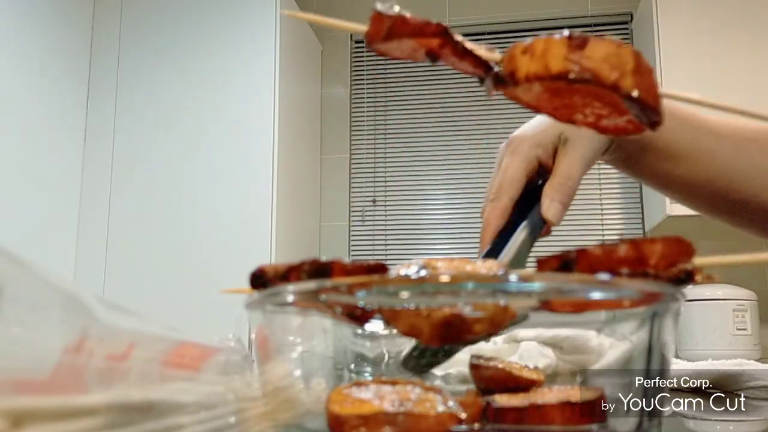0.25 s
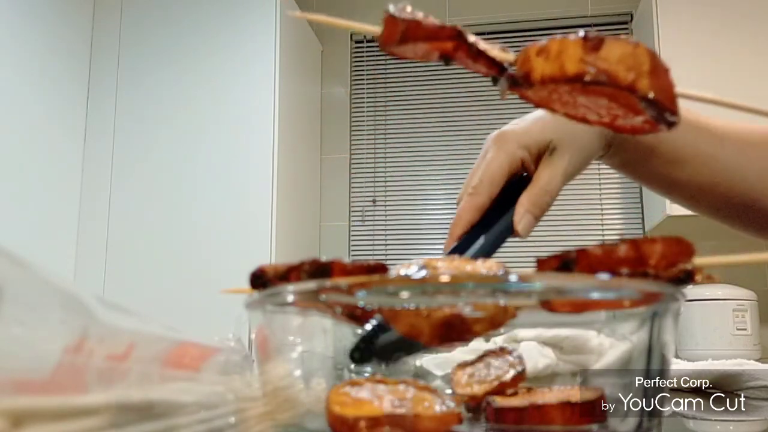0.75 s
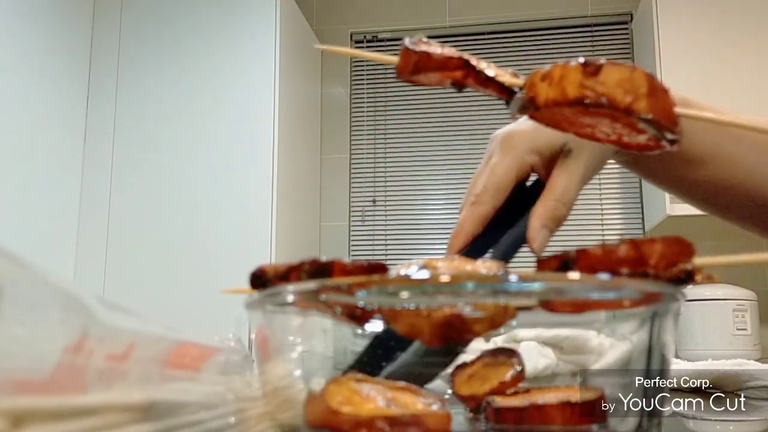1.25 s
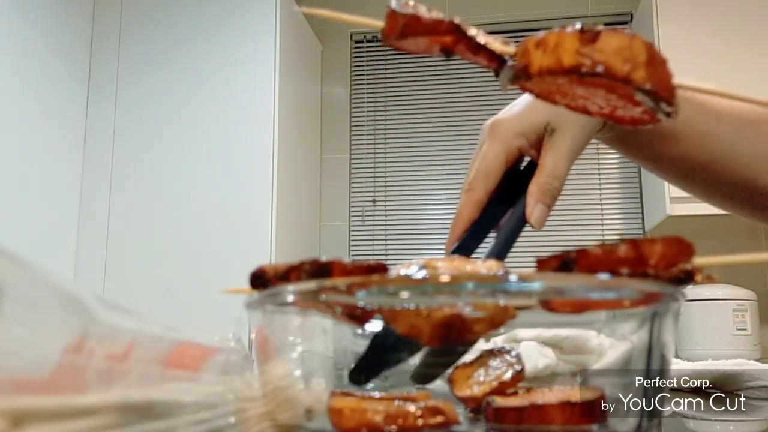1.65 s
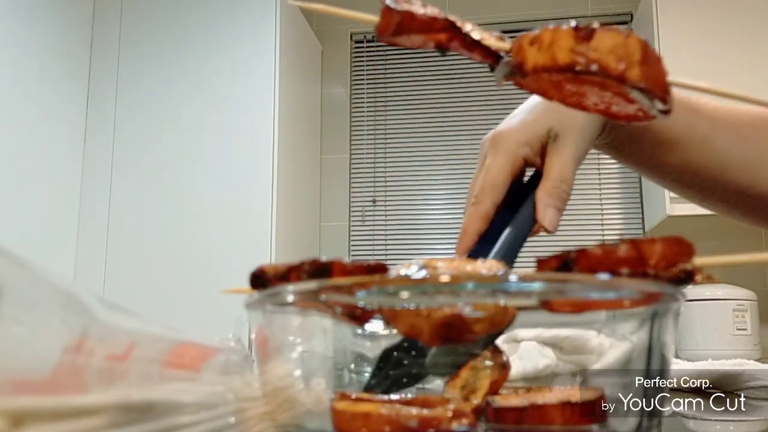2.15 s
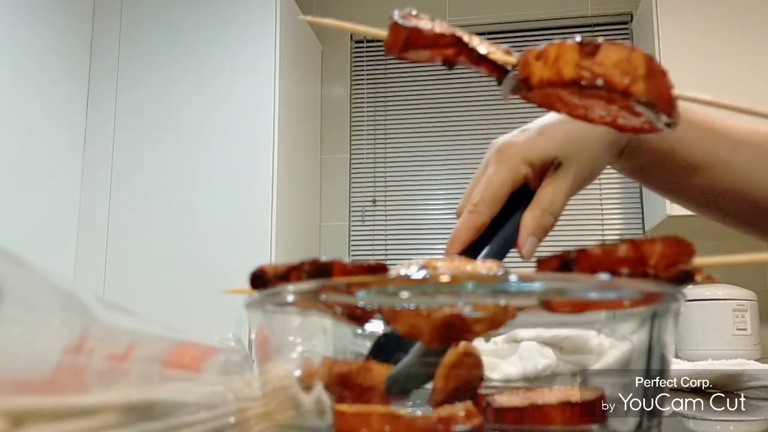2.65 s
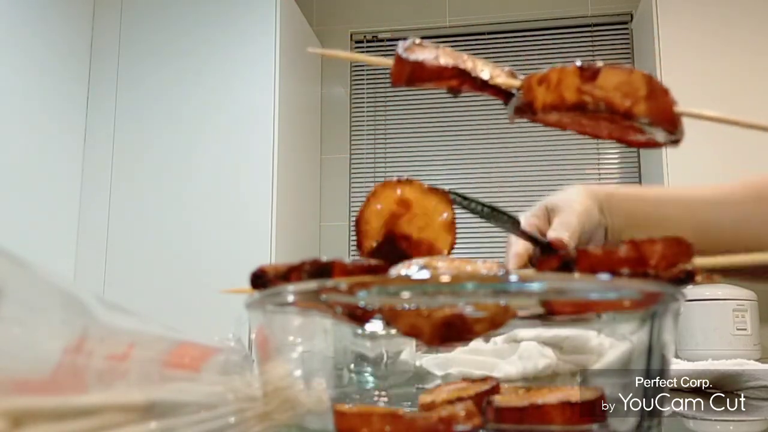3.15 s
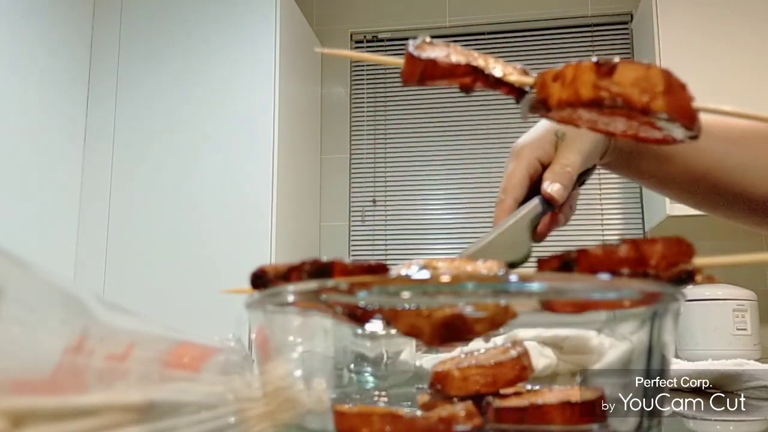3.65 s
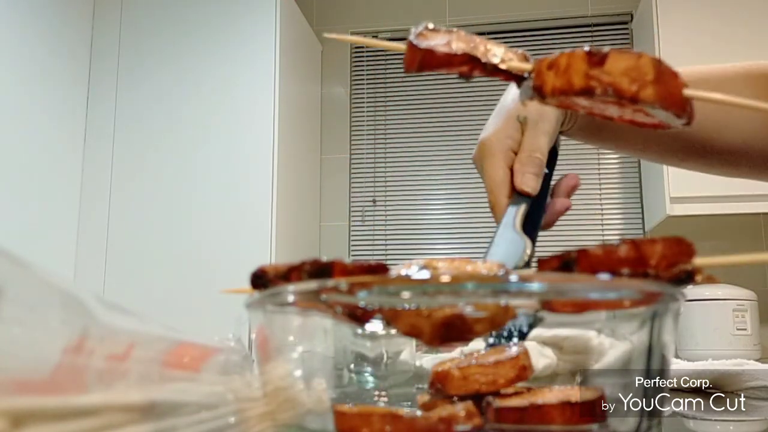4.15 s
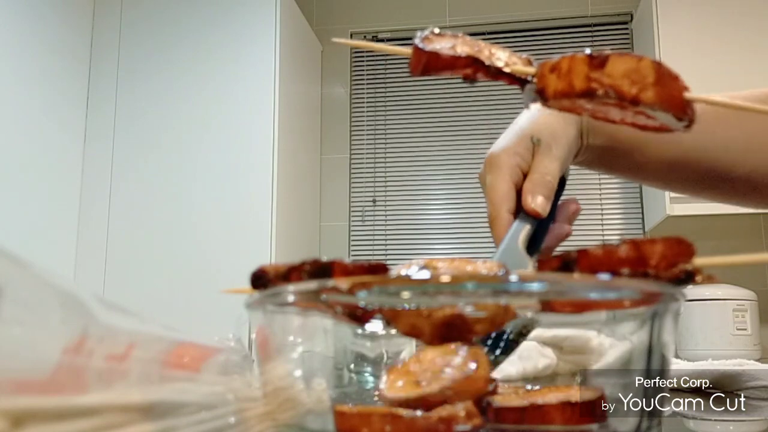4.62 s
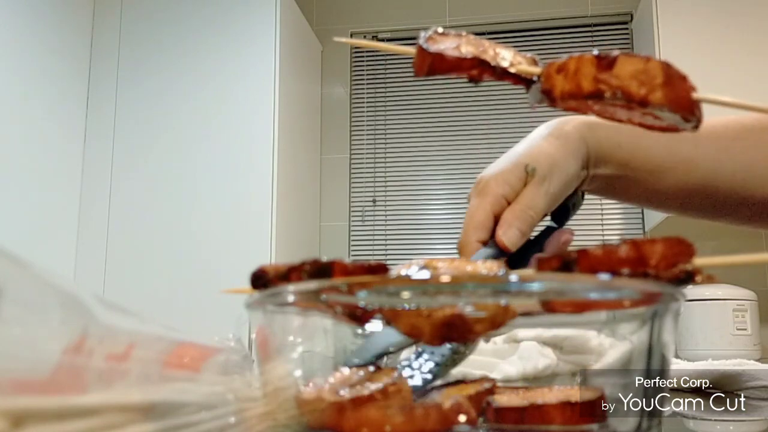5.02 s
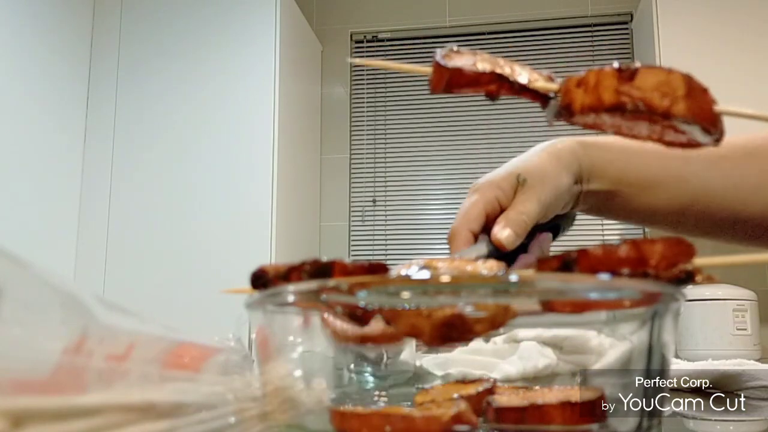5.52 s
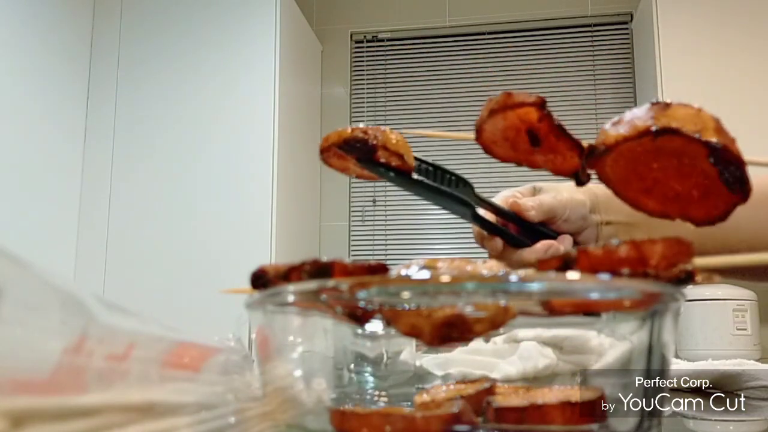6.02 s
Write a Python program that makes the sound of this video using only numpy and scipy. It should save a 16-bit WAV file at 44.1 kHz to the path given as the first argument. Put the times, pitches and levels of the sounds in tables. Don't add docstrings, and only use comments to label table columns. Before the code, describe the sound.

Sparse dull glassy taps from tongs in a bowl, one heavier thud on a dish, faint food rustle and steady fan hum in a kitchen.

```python
import sys
import numpy as np
from scipy import signal
from scipy.fft import rfft, irfft, next_fast_len
from scipy.io import wavfile

SR = 44100
rng = np.random.default_rng(int(sys.argv[2]) if len(sys.argv) > 2 else 0)


def boost(x):
    u = np.asarray(x, float) / 20
    return 10 ** u


def materialize(psi):
    bounded = np.clip(np.atleast_2d(psi).T, -1, 1)
    quanta = np.round(bounded * 32767).astype(np.int16)
    wavfile.write(sys.argv[1], SR, quanta)


N = 276987

# t/s, knock level/dB, knock f/Hz, rim ring level/dB, contact hardness level/dB
BOWL_TAPS = [(0.4062, -54, 1170, -42.5, -52), (0.4474, -46, 1140, -46.5, -57),
             (0.7641, -20, 1164, -28, -41.5), (1.2958, -51, 1210, -58, -46),
             (1.3856, -18, 1194, -23, -26.5), (1.6229, -30.5, 1070, -39.5, -52),
             (1.864, -39, 1250, -52, -47), (2.7535, -22.5, 1260, -29.5, -31),
             (2.838, -25.5, 1283, -33.5, -37.5), (3.2385, -14, 1308, -24, -29.5),
             (3.4284, -22, 1343, -41, -50), (3.877, -28.5, 1268, -30.5, -35.5),
             (4.0458, -21.5, 1324, -31, -42), (4.2245, -26, 1312, -30.5, -39.5)]


def rms_one(x):
    return x / np.sqrt(np.mean(x ** 2) + 1e-20)


def coloured(points, size):
    hz, level_db = np.transpose(points)
    grid_hz = np.arange(size // 2 + 1) * SR / size + 1
    weight = boost(np.interp(np.log(grid_hz), np.log(hz), level_db))
    return rms_one(irfft(rfft(rng.standard_normal(size)) * weight, size))


def ring(x, hz, t60):
    r, w = boost(-60 / (t60 * SR)), 2 * np.pi * hz / SR
    return signal.lfilter([0, np.sin(w)], [1, -2 * r * np.cos(w), r * r], x + 1e-18)


def clicks(times, levels_db):
    x = np.zeros(N)
    x[(np.asarray(times) * SR).astype(int)] = boost(levels_db)
    return x


def struck(times, levels_db, modes, scatter_db, press_s):
    scatter = rng.normal(0, 1, (len(times), len(modes))) * scatter_db
    out = np.zeros(N)
    r = np.exp(-1 / (max(press_s, 1e-4) * SR))
    for k, (hz, mode_db, t60) in enumerate(modes):
        w = 2 * np.pi * hz / SR
        rung = ring(clicks(times, np.asarray(levels_db) + mode_db + scatter[:, k]), hz, t60)
        swelling = signal.lfilter([2 * np.sin(w) * (1 - r)], [1, -2 * r * np.cos(w), r * r], rung)
        out += swelling * (-1) ** k
    return out


def crack(times, levels_db, t60, low_hz, high_hz, rise_s=0.0001):
    r, rise = boost(-60 / (t60 * SR)), np.exp(-1 / (rise_s * SR))
    decay = np.convolve([1, -r], [1, -rise])
    shape = signal.lfilter([1 - rise], decay, clicks(times, levels_db) + 1e-18)
    band = signal.butter(2, [low_hz, high_hz], "band", fs=SR, output="sos")
    return signal.sosfilt(band, shape * rng.standard_normal(N))


def wandering_tone(hz, level_db, drift_rad):
    phase = np.cumsum(rng.standard_normal(N)) * drift_rad
    return np.sqrt(2) * boost(level_db) * np.sin(2 * np.pi * hz * np.arange(N) / SR + phase)


def appliance():
    # f/Hz, level/dB per Hz
    fan = [(36, -35), (62, -22), (71, -19), (101, -18), (118, -12), (139, -8), (177, -3.5), (205, -3.5),
           (335, -8.5), (670, -11), (848, -12.5), (1000, -12.5), (2150, -19.5), (3500, -31.5), (4550, -50),
           (7700, -120)]
    # f/Hz, level/dB per Hz
    preamp = [(2060, -73), (3500, -22), (4200, -6.5), (4640, -9), (6660, -14), (8350, -9), (9340, -16.5),
              (12000, -14.5), (14800, -9.5), (15600, -9.5)]
    # f/Hz, width/Hz, rms level/dB
    drones = [(27.5, 17, -65.5), (166, 29, -68), (304.4, 12, -62), (835.4, 52, -56.5), (1250, 160, -62),
              (4050, 10, -84.5)]
    duct_hz = [136.5, 206]
    # t/s, low over high tone level/dB
    duct_sway = [(0.21, -5), (0.45, 10), (1.2, -14), (1.45, 1.5), (2.9, -12), (3.11, 0.5), (3.45, -3.5),
                 (3.99, 22), (4.18, -10), (4.49, 27), (5.6, -6), (5.8, 19)]
    size = next_fast_len(N)
    out = boost(-51) * coloured(fan, size)[:N] + boost(-73) * coloured(preamp, size)[:N]
    for hz, width_hz, level_db in drones:
        settled = ring(rng.standard_normal(N + SR), hz, 1.8 / width_hz)[SR:]
        out += boost(level_db) * rms_one(settled)
    ratio = boost(np.interp(np.arange(N) / SR, *np.transpose(duct_sway)))
    low_share, high_share = ratio / np.hypot(1, ratio), 1 / np.hypot(1, ratio)
    for hz, share in zip(duct_hz, [low_share, high_share]):
        out += share * wandering_tone(hz, level_db=-58.5, drift_rad=0.0096)
    return out + wandering_tone(48.1, level_db=-62.5, drift_rad=0.01)


def knocks(peak_s=.003, gain_db=2.5):
    out, t = np.zeros(N), np.arange(2000) / SR
    swell = (t / peak_s * np.exp(1 - t / peak_s)) ** 2.84
    for s, level_db, hz, *_ in BOWL_TAPS:
        i = int(s * SR)
        out[i:i + len(t)] += boost(level_db + gain_db) * swell * np.sin(2 * np.pi * hz * t)
    return out


def taps(floor_hz=740, knock_room_db=-4.0, rim_room_db=-4.0, arm_room_db=-8):
    # f/Hz, level/dB, t60/s
    low_modes = [(2012, 5, .035), (2228, -1, .03), (1740, -4, .02), (2026, -17, .3)]
    mid_modes = [(3238, -10, .3), (3268, -11, .36), (3295, -16, .2), (3040, -3, .015), (3650, -4, .015)]
    high_modes = [(4628, 5, .035), (3490, 0, .02), (4612, -22, .28), (4770, -13, .02), (8382, -10, .04),
                  (5716, -11, .06)]
    # f/Hz, level/dB, t60/s
    hum_modes = [(873, 10, 0.05), (1013, 13, 0.029), (899, -13, 0.51), (823, -2, 0.027)]
    # f/Hz, level/dB, t60/s
    long_arm_modes = [(2586, 2, .035)]
    short_arm_modes = [(4004, 2, .035)]
    tip_modes = [(5500, -19, 0.042), (5674, -15, 0.067), (7100, -30, 0.014), (7410, -23, 0.037),
                 (7580, -13.5, 0.055), (8400, -6, 0.03), (10500, -36, .02)]
    # t/s, long arm level/dB, short arm level/dB, tip crack level/dB
    arm_taps = [(0.4062, -53, -45.5, -71), (0.4481, -55, -49.5, -65), (0.7638, -55, -56, -73),
                (1.2964, -48, -54, -58), (1.3865, -33, -36, -43), (1.863, -47, -45.5, -63),
                (2.7537, -35.5, -36, -54), (2.8382, -36, -33.5, -57), (3.2389, -18, -21, -41),
                (3.429, -23, -46, -64), (3.8763, -30, -35, -58), (4.0451, -28.5, -68, -54),
                (4.2251, -42, -44, -57)]
    off_glass = [.41, .45, 3.24, 3.43]
    s, knock, knock_hz, rim_low, hard = np.transpose(BOWL_TAPS)
    arm_s, arm_long, arm_short, tip = np.transpose(arm_taps)

    above_hz = knock_hz - 1260
    hum = knock - 17 - 0.1772 * np.maximum(above_hz, 0)
    damped = np.isclose(s[:, None], off_glass, atol=.01).any(axis=1)
    rim_mid = rim_low - 8 + 0.0196 * above_hz - 10 * damped
    rim_high = rim_low - 9 + 0.4 * (hard - rim_low) - 10 * damped

    glass = [(low_modes, rim_low), (mid_modes, rim_mid), (high_modes, rim_high), (hum_modes, hum)]
    steel = [(long_arm_modes, arm_s, arm_long), (short_arm_modes, arm_s, arm_short), (tip_modes, s, hard)]
    rim = sum(struck(s, level_db, modes, scatter_db=1., press_s=.0011) for modes, level_db in glass)
    arms = sum(struck(at, level_db, modes, scatter_db=1., press_s=.0011) for modes, at, level_db in steel)

    dull = crack(s, knock - 8, t60=0.14, low_hz=855, high_hz=2760, rise_s=0.00029)
    dull = signal.sosfilt(signal.butter(2, 4500, fs=SR, output="sos"), dull)
    clatter = crack(s, hard + 8, t60=0.0046, low_hz=2520, high_hz=8330, rise_s=0.00046)
    noise = dull + clatter + crack(arm_s, tip + 8, t60=0.025, low_hz=9300, high_hz=17200)

    radiates = signal.butter(6, floor_hz, "high", fs=SR, output="sos")
    rim, noise = signal.sosfilt(radiates, [rim, noise])
    body = knocks()
    direct = rim + noise + body + arms
    to_walls = noise + boost(rim_room_db) * rim + boost(knock_room_db) * body + boost(arm_room_db) * arms
    return direct, to_walls


def rustle():
    # start t/s, hold t/s, level/dB
    slides = [
        (0.41, .03, -69),
        (0.455, 0.14, -69),
        (0.59, .025, -64),
        (1.27, 0.11, -80),
        (1.303, .008, -62.5),
        (1.762, .015, -65),
        (2.56, .095, -65.5),
    ]
    # f/Hz, level/dB per Hz
    friction = [(2000, 9), (4000, 2), (6000, -13), (8300, -2), (10000, -15), (13000, -2), (15300, -1),
                (16000, -25)]
    # t/s, peak level/dB
    crumbs = [(0.449, -47), (0.606, -45), (1.294, -44), (1.7754, -61), (2.0094, -63), (2.5636, -49),
              (2.5724, -59), (2.6374, -55), (4.7894, -59), (4.9794, -55), (5.5994, -64)]
    t, gain = np.arange(N) / SR, np.zeros(N)
    for s, hold_s, level_db in slides:
        early, late = np.maximum(s - t, 0), np.maximum(t - s - hold_s, 0)
        gain += boost(level_db - 400 * early - 220 * late)
    grain = boost(4.0 * rms_one(signal.lfilter([1], [1, -.96], rng.standard_normal(N))))
    s, level_db = np.transpose(crumbs)
    cracking = crack(s, level_db - 8, t60=0.017, low_hz=5000, high_hz=17000)
    return gain * grain * coloured(friction, next_fast_len(N))[:N] + cracking


def kitchen(x, first_wall_s=0.0046):
    # f/Hz, t60/s, level/dB
    walls = [(298, 0.24, 2.5), (915, 0.7, 11), (1180, 0.36, -1.5), (1514, 0.41, 6.5), (1920, 0.78, 0),
             (4300, 0.64, -1), (8950, 0.51, 5.5), (12000, 0.36, 0.5), (15500, 0.35, 2)]
    t, tail = np.arange(SR) / SR, 0
    hz, t60, level_db = np.transpose(walls)
    for low in 200 * 2. ** (np.arange(19) / 3):
        third = signal.butter(2, [low, low * 2 ** (1 / 3)], "band", fs=SR, output="sos")
        band = signal.sosfilt(third, rng.standard_normal(SR))
        centre = np.log(low * 1.12)
        band_db = np.interp(centre, np.log(hz), level_db)
        band_t60 = np.interp(centre, np.log(hz), t60)
        tail = tail + band * boost(band_db - 60 * t / band_t60)
    tail = tail * np.clip(t / first_wall_s - 1, 0, 1)
    return signal.fftconvolve(x, tail / np.sqrt(np.sum(tail ** 2)))[:N]


def dish():
    # t/s, level/dB
    blows = [
        (3.2396, -30.5),
        (3.428, -33),
    ]
    # f/Hz, level/dB, t60/s
    dish_modes = [(498, -1, 0.1), (527, -11, 0.15), (562, -6, 0.086), (766, -10, 0.027), (784, -2.5, 0.068),
                  (907, 8.5, 0.012), (1137, 3, 0.11), (1550, -17, 0.039), (1596, 6.5, 0.043),
                  (1780, -7.5, 0.095), (2130, 9.5, 0.026), (4012, -46, 0.28), (7650, -36, .1)]
    s, level_db = np.transpose(blows)
    thud = crack(s, level_db + 13, t60=0.098, low_hz=474, high_hz=1090, rise_s=0.0015)
    return struck(s, level_db, dish_modes, scatter_db=3.0, press_s=0.0015) + thud


def scene():
    hum = appliance()
    direct, to_walls = taps()
    food, vessel = rustle(), dish()
    tail = kitchen(to_walls + boost(-1.5) * vessel + food)
    return (direct + vessel + food + boost(-6) * tail + hum)[None]


def band_limit(x):
    return signal.sosfilt(signal.butter(12, 16750, fs=SR, output="sos"), x)


def record(dry):
    ceiling = .6
    rounded = ceiling * np.tanh(dry / ceiling)
    top_cut = signal.cheby2(16, 24, 15900, fs=SR, output="sos")
    return band_limit(signal.sosfilt(top_cut, rounded))


dry = scene()
out = record(dry)
materialize(out)
```